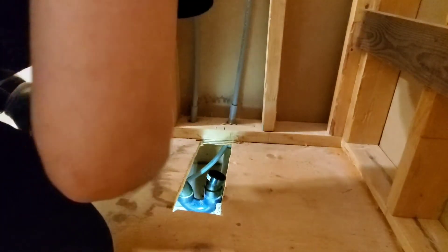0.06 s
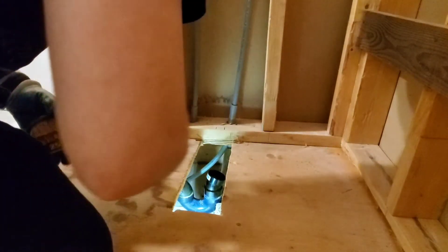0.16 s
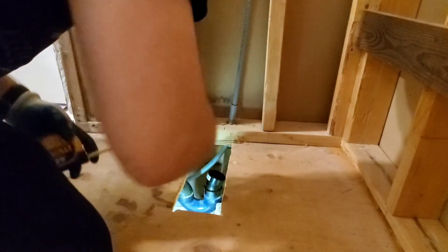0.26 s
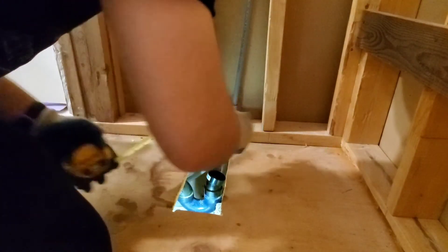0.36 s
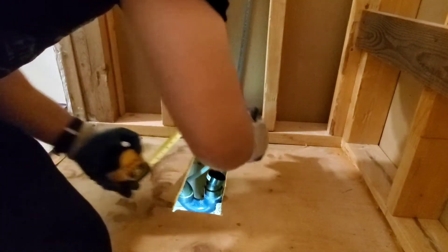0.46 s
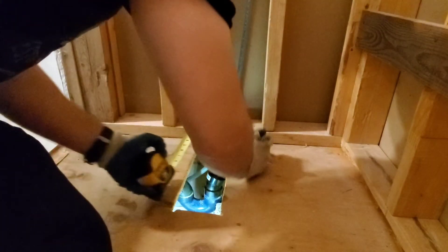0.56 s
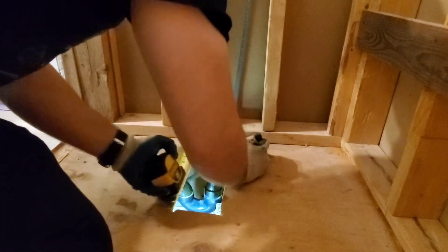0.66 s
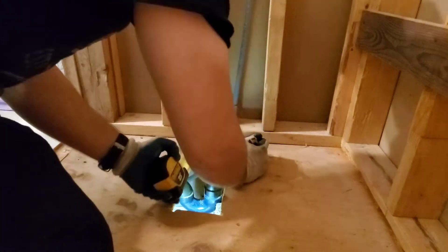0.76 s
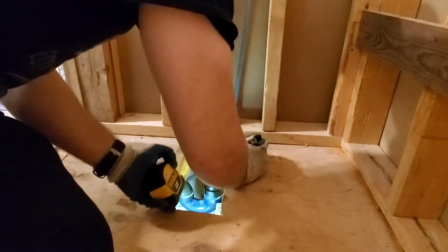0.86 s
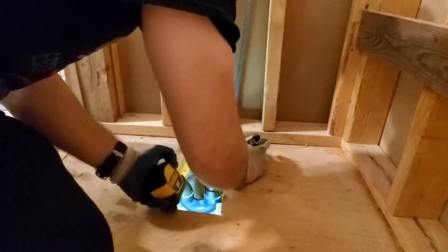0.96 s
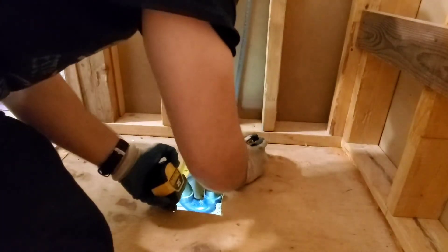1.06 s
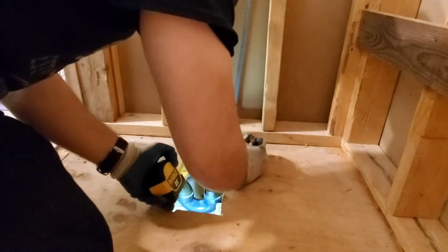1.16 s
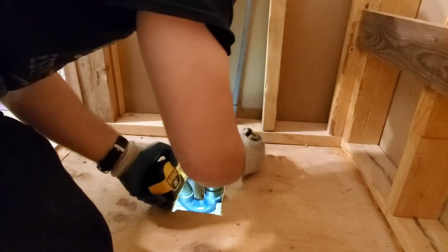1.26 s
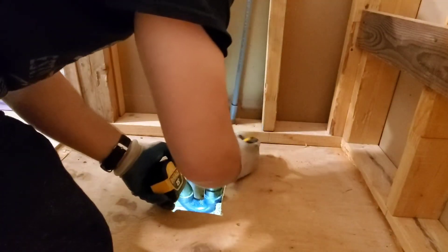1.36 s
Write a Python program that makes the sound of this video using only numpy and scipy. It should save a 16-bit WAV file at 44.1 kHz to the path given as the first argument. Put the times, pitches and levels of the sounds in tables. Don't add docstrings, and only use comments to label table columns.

```python
import sys
import numpy as np
from scipy import signal
from scipy.fft import rfft, irfft
from scipy.io import wavfile

SR = 44100
rng = np.random.default_rng(int(sys.argv[2]) if len(sys.argv) > 2 else 0)


def ratio(d):
    e = np.asarray(d, float) / 20
    return 10 ** e


def log_audio(samples):
    frames = np.atleast_2d(samples).T
    limited = np.clip(frames, -1, 1)
    pcm = np.round(limited * 32767).astype(np.int16)
    wavfile.write(sys.argv[1], SR, pcm)


N = 63945

# f/Hz, level/dB, t60/s
PIPE = [(236, -0.5, 0.25), (305.5, 0, 0.175), (355.8, 1.5, 0.22), (425, 6.5, 0.052), (508, 4.5, 0.06),
        (550, 5, 0.059), (648, 8.5, 0.035), (750, 7.5, 0.035), (850, 2.5, 0.048), (1032, 6.5, 0.024),
        (1270, 3, 0.053), (1630, 19, 0.074)]
# f/Hz, level/dB, t60/s
BOARD = [(44, -42, 0.17), (71.6, 8.5, 0.22), (81, 4.5, 0.18), (121.2, -9.5, 0.41), (160, -1, 0.17),
         (209.6, -10.5, 0.26)]


def rms_one(x):
    return x / np.sqrt(np.mean(x ** 2) + 1e-20)


def at_hz(points, hz):
    table_hz, value = np.array(points).T
    return np.interp(np.log(hz), np.log(table_hz), value)


def over_time(s, value):
    return np.interp(np.arange(N) / SR, s, value)


def drift(rate_hz):
    r = np.exp(-80 * np.pi * rate_hz / SR)
    white = rng.standard_normal(N // 40 + 2002)
    slow = signal.lfilter([1], [1, -2 * r, r * r], white)[2000:]
    return np.interp(np.arange(N) / 40, np.arange(len(slow)), rms_one(slow))


def swell(s, length):
    return over_time([s, s + 0.18 * length, s + length], [0, 1, 0])


def sides(pan_db):
    return ratio(np.array([[0.5], [-0.5]]) * pan_db)


def off_centre(hz, centre_hz, fall_db):
    return -fall_db * np.log2(hz / centre_hz) ** 2


def ring(push, hz, t60):
    r, w = ratio(-60 / (t60 * SR)), 2 * np.pi * hz / SR
    return signal.lfilter([0, np.sin(w)], [1, -2 * r * np.cos(w), r * r], push + 1e-18)


def peaks(x, table):
    out = 0
    for k, (hz, width, db) in enumerate(table):
        r, w = np.exp(-np.pi * width / SR), 2 * np.pi * hz / SR
        top = np.array([1, 0, -1]) * (1 - r * r) / 2
        out = out + (-1) ** k * ratio(db) * signal.lfilter(top, [1, -2 * r * np.cos(w), r * r], x)
    return out


def bands(white, gain_at):
    # f/Hz, left-right likeness (0 to 1)
    likeness = [(60, 0.69), (150, 0.26), (300, 0.55), (1500, 0.018), (12000, 0.05)]
    band_edges = 28 * 2 ** np.arange(0, 9.6, 0.5)
    out = 0
    for k, (low, high) in enumerate(zip(band_edges, band_edges[1:])):
        sos = signal.butter(2, [low, high], "band", fs=SR, output="sos")
        mid, side = signal.sosfilt(sos, white[k % 2])
        hz = np.sqrt(low * high)
        alike = np.clip(at_hz(likeness, hz), 0, 1)
        wide = np.sqrt(1 - alike) * side * [[1], [-1]]
        out = out + gain_at(hz) * (np.sqrt(1 + alike) * mid + wide)
    return out


def struck(hits, modes, fall_db, cycles):
    out, t = np.zeros((2, N + SR)), np.arange(SR // 2) / SR
    for s, db, centre_hz, *pan_db in hits:
        bump = np.sin(np.pi * np.clip(t * centre_hz / cycles, 0, 1)) ** 2
        push = bump * np.sin(2 * np.pi * centre_hz * t)
        strength = (-1) ** np.arange(len(modes)) * ratio(rng.normal(0, 2.87, len(modes)))
        sound = 0
        for (hz, mode_db, t60), c in zip(modes, strength):
            sound = sound + c * ratio(mode_db + off_centre(hz, centre_hz, fall_db)) * ring(push, hz, t60)
        i = int(s * SR)
        out[:, i:i + len(t)] -= ratio(db) * sound / np.abs(sound).max() * sides(sum(pan_db, 1.0))
    return out[:, :N]


def hush():
    # f/Hz, level/dB per Hz
    hush_colour = [(18, -39), (30, -8), (75, -3.5), (259, -33), (473, -14), (962, -24), (2230, -24.5),
                   (7670, -37.5), (16000, -27)]
    white = rng.standard_normal((2, 2, N))
    return ratio(-63.5) * rms_one(bands(white, lambda hz: ratio(at_hz(hush_colour, hz) + 2 * drift(6))))


def rub():
    # t/s, level/dB, brightness/dB per octave
    rub_course = [(0, -59.5, -5.2), (0.068, -88.5, 3.5), (0.102, -54.5, -1), (0.15, -51, -0.3),
                  (0.22, -44, 0.1), (0.3, -37, -0.4), (0.361, -35.5, 1.5), (0.422, -41, 0.4),
                  (0.485, -50, -2), (0.58, -63.5, -1), (0.95, -57.5, -3.1), (1.012, -49, -2.5),
                  (1.05, -49, -1.5), (1.118, -59, -0.8), (1.198, -61.5, -3), (1.272, -55.5, -2.8),
                  (1.33, -61.5, -1.5), (1.45, -68, -1.5)]
    # f/Hz, level/dB per Hz
    rub_colour = [(530, -17.5), (900, -11), (1510, -8), (3190, -2), (4050, -6), (5480, -7), (9530, -14),
                  (12300, -6), (16000, -7.5)]
    grain_share, grains_per_s = 0.34, 2500
    grain_size = ratio(2.9 * np.minimum(rng.exponential(1, (2, 2, N)), 3.0))
    grit = grain_size * (rng.random((2, 2, N)) < grains_per_s / SR)
    white = rng.standard_normal((2, 2, N)) * (1 - grain_share + grain_share * rms_one(grit))
    together = 1.36 * drift(11.4) + 0.88 * drift(94)
    s, db, tilt_db = np.transpose(rub_course)
    bright = over_time(s, tilt_db)

    def gain_at(hz):
        flutter = together + 2.13 * drift(12.4)
        return ratio(at_hz(rub_colour, hz) + flutter + bright * np.log2(hz / 4000))

    return ratio(over_time(s, db)) * rms_one(bands(white, gain_at)) * sides(4.0)


def creep():
    # t/s, level/dB
    weight = [(0, -67), (0.1, -77), (0.2, -51), (0.27, -66), (0.398, -65), (0.501, -53), (0.6, -61.5),
              (0.7, -54.5), (0.8, -54.5), (0.92, -65.5), (1.0, -47), (1.18, -49.5), (1.23, -61.5),
              (1.45, -59)]
    s, db = np.transpose(weight)
    shaken = 0
    for hz, mode_db, t60 in BOARD:
        shaken = shaken + ratio(mode_db) * rms_one(ring(rng.standard_normal(N), hz, t60 / 2))
    return ratio(over_time(s, db)) * rms_one(shaken) * sides(0.9)


def drags():
    glove_drags = [
        (0.0, 0.22, -73, 380),
        (0.11, 0.22, -56, 490),
        (0.31, 0.29, -48, 435),
        (0.626, 0.14, -50.5, 880),
        (0.63, 0.14, -49, 320),
        (0.94, 0.25, -52.5, 367),
        (1.092, 0.072, -77, 430),
        (1.055, 0.085, -48, 244),
        (1.22, 0.19, -60, 970),
    ]
    out = 0
    for s, length, db, centre_hz in glove_drags:
        white = rng.standard_normal((2, N)) + 1.04 * rng.standard_normal(N)
        sung = 0
        for k, (hz, mode_db, t60) in enumerate(PIPE):
            gain = (-1) ** k * ratio(mode_db + off_centre(hz, centre_hz, 26.7))
            sung = sung + gain * rms_one(ring(white, hz, t60))
        out = out + ratio(db) * rms_one(sung) * swell(s, length)
    return out * sides(5.7)


def sings():
    sung_tones = [(0.077, 0.1, -57.5, 3130, 12), (0.102, 0.34, -51.5, 3190, 6.2),
                  (0.14, 0.15, -53, 2120, 7.5), (0.14, 0.29, -55.5, 5900, 7.7),
                  (0.291, 0.031, -38.5, 3000, 15), (0.304, 0.021, -38.5, 3080, 8.8),
                  (0.346, 0.071, -46.5, 5400, 36), (0.36, 0.087, -46.5, 3400, 10),
                  (0.32, 0.13, -46, 11650, 8), (0.63, 0.066, -55, 3200, 6.5),
                  (1.05, 0.099, -46.5, 1080, 3.6), (1.1, 0.11, -64, 2700, 7.1),
                  (1.056, 0.13, -44.5, 4440, 4.8), (1.056, 0.084, -62, 5500, 13),
                  (0.129, 0.14, -53, 650, 9.3), (0.628, 0.094, -46, 772, 4.1),
                  (0.11, 0.17, -56, 12800, 3.3), (0.63, 0.025, -49, 15700, 10),
                  (1.052, 0.055, -51, 1670, 4), (0.33, 0.063, -44, 380, 3.4)]
    out = 0
    for s, length, db, hz, sharp in sung_tones:
        one = [(hz, hz / sharp, 0)]
        level = ratio(db + 1.8 * drift(51))
        sung = peaks(peaks(rng.standard_normal((2, N)), one), one)
        out = out + level * rms_one(sung) * swell(s, length)
    return out * sides(4.6)


def snaps():
    # t/s, body peak level/dB, sizzle peak level/dB, body centre f/Hz, left-right/dB
    blade_snaps = [(0.083, -56.5, -77, 3270, 7), (0.098, -44, -43.5, 4360, 5.5),
                   (0.443, -43, -43.5, 3440, 17), (0.4647, -35.5, -49, 3500, 3),
                   (0.5147, -46.5, -42.5, 4500, 4), (0.618, -43.5, -46, 5100, 4),
                   (0.6222, -43, -46, 2940, 12), (0.6323, -26.5, -29.5, 3500, 5),
                   (0.788, -32, -31, 4320, 4.5), (0.884, -46.5, -41.5, 4340, 6),
                   (0.887, -35.5, -51, 4860, 3), (0.9707, -41.5, -40.5, 3950, 5.5),
                   (1.0209, -32, -35, 3810, 6), (1.025, -33.5, -29, 5830, 0), (1.0521, -23, -23, 4360, 4.5),
                   (1.274, -51, -50, 4500, 5)]
    faint_snap = [
        (1.0455, -36, -40, 3600, 5.0),
    ]
    # f/Hz, width/Hz, level/dB
    snap_body = [(2106, 1190, 2), (2890, 647, 4), (3726, 950, 2.5), (4500, 1240, 0.5), (5530, 1350, 0.5),
                 (6570, 2350, -2.5)]
    # f/Hz, width/Hz, level/dB
    snap_sizzle = [(8530, 1260, 0), (10820, 1480, 3), (14700, 1640, 4)]
    rise_s, t60_s = 0.00052, 0.02
    out, t = np.zeros((2, N + SR)), np.arange(SR // 8) / SR
    shape = (1 - np.exp(-t / rise_s)) * ratio(-60 * t / t60_s)
    for s, body_db, sizzle_db, centre_hz, pan_db in [*blade_snaps, *faint_snap]:
        crackle = rng.standard_normal((2, len(t))) * shape
        body = peaks(crackle, [(hz, w, d + off_centre(hz, centre_hz, 12)) for hz, w, d in snap_body])
        sizzle = peaks(crackle, snap_sizzle)
        both = body / np.abs(body).max() * ratio(body_db) + sizzle / np.abs(sizzle).max() * ratio(sizzle_db)
        i = int(s * SR)
        out[:, i:i + len(t)] += 2 * both * sides(pan_db)
    return out[:, :N]


def ticks():
    # t/s, peak level/dB, centre f/Hz
    hook_ticks = [
        (0.097, -44, 14500),
        (0.3525, -38, 13000),
        (0.385, -40, 12000),
        (0.407, -39, 15000),
        (0.444, -39, 14000),
        (0.4648, -36, 15500),
        (0.5149, -27.5, 15000),
        (1.0217, -33, 13000),
    ]
    t60_s, wide_db = 0.0047, -18
    out, t = np.zeros((2, N)), np.arange(SR // 20) / SR
    for s, db, centre_hz in hook_ticks:
        noise = rng.standard_normal((2, len(t))) + 0.51 * rng.standard_normal(len(t))
        contact = (noise + 8.5 * (t == 0)) * ratio(-60 * t / t60_s)
        tick = peaks(contact, [(centre_hz, 1800, 0), (8000, 9000, wide_db)])
        i = int(s * SR)
        out[:, i:i + len(t)] += 2 * ratio(db) * tick / np.abs(tick).max() * sides(4.2)
    return out


def knocks():
    # t/s, peak level/dB, centre f/Hz, left-right/dB
    pipe_knocks = [(0.3045, -38.5, 850, 3.5), (0.315, -45, 425, -4), (0.35, -45.5, 570, -10),
                   (0.6295, -43, 346, 1), (0.634, -44.5, 774, 5), (0.66, -46, 784, 2),
                   (0.74, -51, 355, 5.5), (1.058, -34.5, 470, 0.5), (1.11, -40.5, 328, 4.5),
                   (1.2, -55.5, 750, 13), (1.29, -60, 1400, 8), (1.41, -52, 280, 6.5)]
    return struck(pipe_knocks, PIPE, 13.5, 1.56)


def taps():
    # t/s, peak level/dB, centre f/Hz, left-right/dB
    fitting_taps = [(0.3048, -32.5, 460, 11.5), (0.33, -40, 376, 2), (0.347, -38.5, 438, 9),
                    (0.368, -44.5, 440, 11), (0.6275, -39, 313, 3.0), (0.6325, -35, 1626, 5),
                    (0.6323, -31.5, 3500, 17), (0.7885, -46, 2040, 11), (1.0528, -27, 5260, -1),
                    (1.0532, -37, 2900, 1), (1.062, -37.5, 330, 2)]
    # f/Hz, level/dB, t60/s
    fitting = [(236.8, -4, 0.21), (316, 0, 0.078), (370, -4, 0.063), (439.3, 6.5, 0.069), (622, 4.5, 0.2),
               (1626, 7, 0.1), (2150, 0, 0.055), (2860, 0, 0.036), (3500, 9, 0.026), (3900, 4, 0.035),
               (4500, -8, 0.019), (5240, -1, 0.022)]
    return struck(fitting_taps, fitting, 49.0, 1.35)


def thumps():
    # t/s, peak level/dB, centre f/Hz
    knee_thumps = [
        (0.305, -47.5, 123),
        (0.35, -46.5, 184),
        (0.63, -41.5, 137),
        (0.74, -47.5, 148),
        (0.78, -56, 72.4),
        (1.066, -32, 160),
        (1.095, -59, 149),
        (1.25, -48.5, 160),
        (1.36, -60, 82),
    ]
    return struck(knee_thumps, BOARD, 6.6, 0.99)


def room(x):
    # f/Hz, t60/s
    room_t60 = [(200, 0.82), (1000, 0.51), (4000, 0.31), (12000, 0.31)]
    # f/Hz, level/dB
    room_colour = [(200, -1), (1000, 12), (3500, -3.5), (7500, 1), (14000, -2.7)]
    gap_s = 0.00086
    t = np.arange(N) / SR
    white = rng.standard_normal((2, 2, N))
    tail = bands(white, lambda hz: ratio(at_hz(room_colour, hz) - 60 * t / at_hz(room_t60, hz)))
    tail = tail * np.clip(t / gap_s - 1, 0, 1)
    return ratio(-32) * signal.fftconvolve(x, tail, axes=1)[:, :N]


def shudder():
    board_shudders = [
        (0.949, 0.19, -35.5, 67.3),
        (0.95, 0.17, -42.5, 160),
        (1.056, 0.17, -42.5, 63.8),
    ]
    t = np.arange(N) / SR
    out = 0
    for s, length, db, hz in board_shudders:
        out = out + ratio(db) * np.sin(2 * np.pi * hz * (t - s)) * swell(s, length)
    return out * sides(1.0)


def scene():
    snap, knock = snaps(), knocks()
    blade = rub() + sings() + snap + ticks()
    pipe = drags() + knock + taps()
    floor = creep() + thumps() + shudder()
    return hush() + blade + pipe + floor + room(snap + ratio(-9) * knock)


def roll_off(x):
    return signal.sosfilt(signal.butter(12, 17140, fs=SR, output="sos"), x)


def record(dry):
    # f/Hz, left-right/dB
    port_lean = [(150, 0.4), (400, 0.4), (2500, 2.5), (5000, -1), (9000, -2), (13000, -1.8)]
    hz = np.arange(1, N // 2 + 2) * SR / N
    ports = irfft(rfft(dry) * sides(at_hz(port_lean, hz)), N)
    top = 0.24
    rounded = top * np.tanh(ports / top)
    thin = signal.sosfilt(signal.butter(2, 51, "high", fs=SR, output="sos"), rounded)
    mix = signal.sosfilt(signal.ellip(8, 0.5, 30, 15900, fs=SR, output="sos"), thin)
    return roll_off(mix)


dry = scene()
out = record(dry)
log_audio(out)
```